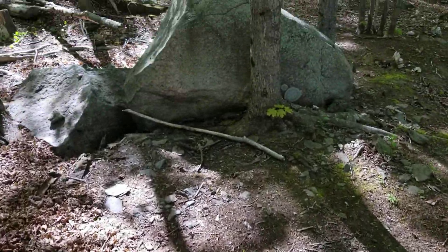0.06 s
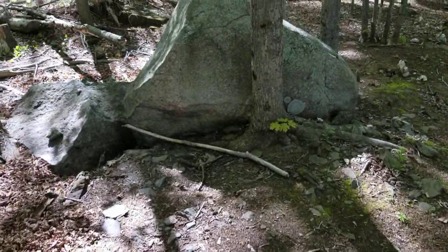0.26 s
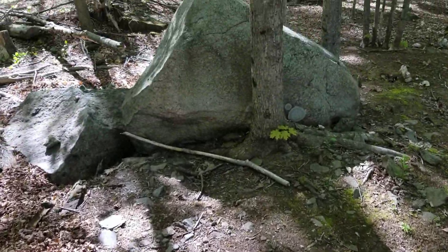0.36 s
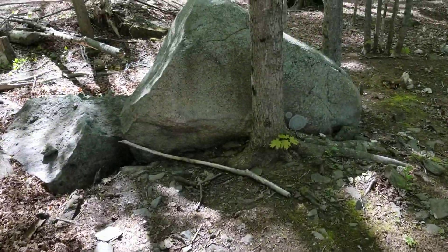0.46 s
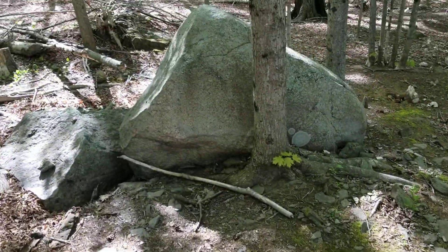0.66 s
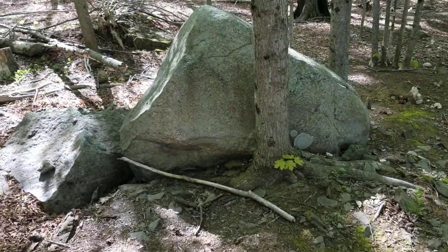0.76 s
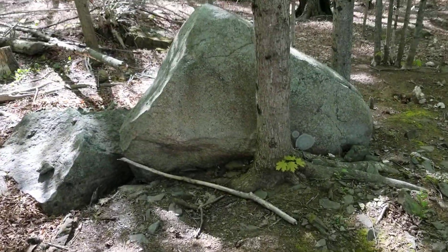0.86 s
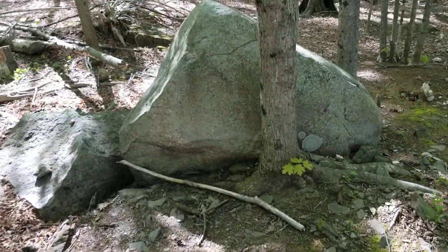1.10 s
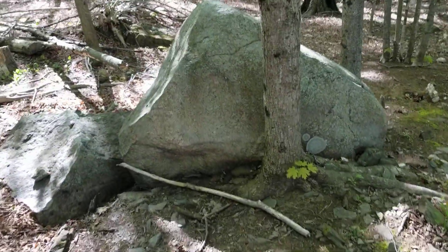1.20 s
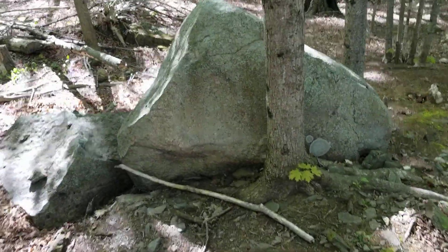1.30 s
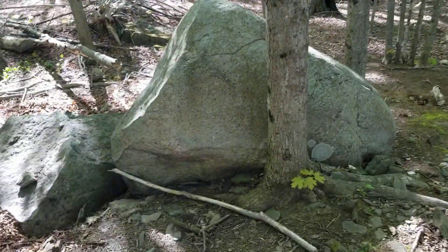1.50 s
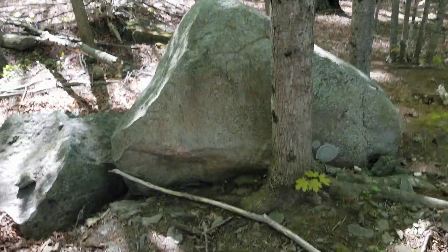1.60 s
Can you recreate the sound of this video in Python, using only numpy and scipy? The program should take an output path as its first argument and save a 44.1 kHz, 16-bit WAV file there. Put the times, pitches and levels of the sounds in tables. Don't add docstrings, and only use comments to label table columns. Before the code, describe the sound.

Footsteps in dry leaves, close to a handheld stereo microphone outdoors. Faint hush and low breeze rumble throughout. At about 0.2 s a soil thud and loud twig snap, several cracks within a few hundredths of a second, splintering briefly. Leaves drag and fade, drifting slightly right, while a distant bird whistles falling notes from 0.45 to 1.0 s. From 1.05 s heavier crunching, knocks and small snaps, strongest 1.3-1.5 s; bird again near 1.6 s.

```python
import sys
import numpy as np
from scipy import signal
from scipy.fft import rfft, irfft
from scipy.io import wavfile
from scipy.ndimage import map_coordinates

SR = 44100
rng = np.random.default_rng(int(sys.argv[2]) if len(sys.argv) > 2 else 0)


def amplitude_ratio(level_db):
    exponent = np.asarray(level_db, float) / 20
    return 10 ** exponent


def master_out(mix):
    frames = np.transpose(np.atleast_2d(mix))
    ceiling = np.clip(frames, -1, 1)
    pcm = np.round(ceiling * 32767).astype(np.int16)
    wavfile.write(sys.argv[1], SR, pcm)


N = 72765


def colour(x, points):
    hz, db = np.array(points, float).T
    grid_hz = np.linspace(1, SR / 2, 2049)
    gain = amplitude_ratio(np.interp(np.log(grid_hz), np.log(hz), db))
    cepstrum = irfft(np.log(gain))
    cepstrum[1:2048] *= 2
    cepstrum[2049:] = 0
    impulse = irfft(np.exp(rfft(cepstrum)))
    return signal.fftconvolve(x, impulse.reshape((1,) * (x.ndim - 1) + (-1,)), axes=-1)[..., :N]


def band(x, hz, kind, order=2):
    return signal.sosfilt(signal.butter(order, hz, kind, fs=SR, output="sos"), x)


def smooth_low(x, hz):
    return signal.filtfilt(*signal.butter(2, hz, fs=SR), x)


def pair(alike_hz):
    noise = rng.standard_normal((3, N))
    return band(noise[:1], alike_hz, "low", order=1) + band(noise[1:], alike_hz, "high", order=1)


def walk(rate_hz):
    x = band(rng.standard_normal(N + SR), rate_hz, "low")[SR:]
    return x / x.std()


def echo(x, t60_s):
    t = np.arange(SR) / SR
    tail = rng.standard_normal((2, SR)) * amplitude_ratio(-60 * t / t60_s) * np.minimum(t / 0.03, 1)
    tail = tail / np.sqrt(np.sum(tail ** 2, axis=1, keepdims=True))
    return signal.fftconvolve(np.atleast_2d(x), tail, axes=1)[:, :N]


def burst(t, start_s, rise_s, t60_s):
    late_s = t - start_s
    return np.where(late_s < 0, np.exp(-(late_s / rise_s) ** 2), amplitude_ratio(-120 * np.maximum(late_s, 0) / t60_s))


def crackle(spread_db):
    grains_per_s, grain_s, alike_hz = 3000, 0.0011, 1620
    chance = rng.random((2, N))
    hits = (chance[0] < grains_per_s / SR) * amplitude_ratio(-2 * spread_db * np.log(chance[1] + 1e-9))
    grain = np.sqrt(signal.lfilter([1], [1, -np.exp(-1 / (grain_s * SR))], hits))
    return grain / np.sqrt(np.mean(grain ** 2)) * pair(alike_hz)


def halves(source, low_gain, top_gain):
    split_hz = 8200
    low = band(source, split_hz, "low", order=4)
    top = band(source, split_hz, "high", order=4)
    return low * low_gain + top * top_gain


def mix(source, t, rows):
    power = 0
    for peak_s, db, rise_s, t60_s, top_db in rows:
        power = power + burst(t, peak_s, rise_s, t60_s) * amplitude_ratio([[2 * db], [2 * (db + top_db)]])
    return halves(source, *np.sqrt(power))


def air():
    hush_db, hush_alike_hz = -64.5, 1490
    wind_db, wind_low_hz, wind_high_hz, gust_db, gust_hz = -67.5, 27, 63, 2.6, 3.2
    # hz, gain_db
    hush_shape = [(25, -24), (60, 10), (111, 5), (277, -14), (416, -24.5), (1940, -36.5), (4500, -6.5),
                  (9000, -24.5)]
    hush = colour(pair(hush_alike_hz), hush_shape)
    wind = band(band(rng.standard_normal((2, N)), wind_high_hz, "low"), wind_low_hz, "high")
    wind = wind * amplitude_ratio(gust_db * walk(gust_hz))
    return hush / hush.std() * amplitude_ratio(hush_db) + wind / wind.std() * amplitude_ratio(wind_db)


def bird(t):
    warble_hz, warble_rate_hz, bend = 85, 152, 1.7
    pan_db, echo_db, echo_t60_s = -7.5, 2, 0.5
    # start_s, length_s, from_hz, to_hz, level_db
    notes_sung = [
        (.445, .04, 4800, 4030, -60),
        (.6, 0.039, 5630, 5200, -65),
        (0.631, 0.038, 5483, 3940, -58),
        (0.763, 0.022, 4260, 4630, -59),
        (0.788, 0.064, 4480, 3057, -66.5),
        (0.922, 0.034, 5700, 5320, -59.5),
        (.964, 0.038, 5660, 3830, -57),
        (1.585, 0.044, 5450, 5280, -61),
        (1.627, 0.018, 5400, 4050, -51),
    ]
    warble = warble_hz * walk(warble_rate_hz)
    out = 0
    for start_s, length_s, from_hz, to_hz, db in notes_sung:
        part = np.clip((t - start_s) / length_s, 0, 1)
        hz = to_hz + (from_hz - to_hz) * (1 - part) ** bend
        swell = np.sin(np.pi * part ** 1.05) ** 0.19
        out = out + amplitude_ratio(db) * swell * np.sin(2 * np.pi * np.cumsum(hz + warble) / SR)
    return (out + amplitude_ratio(echo_db) * echo(out, echo_t60_s)) * amplitude_ratio([[pan_db / 2], [-pan_db / 2]])


def thuds(t):
    push_cycles, ring_cycles = .25, 5.5
    rub_share, rub_rise_s, soil_q = .22, .003, .8
    # start_s, level_db, pitch_hz, t60_s
    knocks = [(.165, -57.5, 295, 0.054), (0.2247, -33.5, 285, 0.0083), (.2258, -40.5, 850, 0.023),
              (.2855, -44.5, 620, 0.036), (0.3403, -51, 310, .03), (1.084, -57, 231, 0.072),
              (1.245, -46.5, 650, 0.025), (1.296, -38.5, 696, 0.038), (1.331, -35.5, 1160, 0.018),
              (1.359, -50, 285, 0.15), (1.389, -44.5, 414, 0.24), (1.457, -39, 440, 0.06),
              (1.485, -49, 1010, 0.029), (1.557, -53, 744, 0.14), (1.628, -44, 490, 0.28),
              (1.638, -43.5, 184, 0.18)]
    out = 0
    for start_s, db, hz, t60_s in knocks:
        push_s = push_cycles / hz
        ring = np.sin(2 * np.pi * hz * (t - start_s))
        ring = ring * np.sqrt(burst(t, start_s + push_s, push_s, ring_cycles / hz))
        soil = signal.iirpeak(hz, soil_q, fs=SR)
        rub = signal.lfilter(*soil, signal.lfilter(*soil, rng.standard_normal(N)))
        rub = rub * np.sqrt(SR / hz) * rub_share
        out = out + amplitude_ratio(db) * (ring + rub * np.sqrt(burst(t, start_s + rub_rise_s, rub_rise_s, t60_s)))
    return out


def twigs(t):
    ring_hz, ring_spread, ring_t60_s, ring_db, ring_right_db = 4300, 0.049, .014, 3, -7
    ring_rise_s, crack_rise_s, spread_db = 0.000078, .0002, 1.0
    break_s = [.2226, .2264, .2292, .2405]
    # level_db, t60_s, top_db
    break_steps = [
        (-16.5, .035, -6),
        (-17.5, .028, -3),
        (-25, .11, 3),
        (-36, .08, -3),
    ]
    # start_s, level_db, t60_s, top_db
    small_cracks = [(0.058, -76, 0.0125, -5), (0.152, -64, 0.018, 6), (0.775, -68, .02, 10.5),
                    (.797, -53.5, 0.022, -30), (.895, -70, .015, 0), (1.328, -38, 0.012, -12),
                    (1.417, -50, 0.011, 13.5), (1.442, -45, 0.015, 3.5), (1.495, -35.5, 0.023, -11),
                    (1.54, -41.5, 0.024, 0), (1.588, -44, 0.0096, -6)]
    # hz, gain_db
    twig_shape = [(100, -12), (300, -10), (1000, -14.5), (2000, -12), (3500, 3.5), (15000, -0.5)]
    rows = [(start_s, *step) for start_s, step in zip(break_s, break_steps)] + list(small_cracks)
    ring = 0
    for start_s, db, t60_s, top_db in rows:
        hz = ring_hz * (1 + ring_spread * rng.standard_normal())
        fade = np.sqrt(burst(t, start_s, ring_rise_s, ring_t60_s))
        ring = ring + amplitude_ratio(db + ring_db) * np.sin(2 * np.pi * hz * (t - start_s)) * fade
    cracks = [(start_s, db, crack_rise_s, t60_s, top_db) for start_s, db, t60_s, top_db in rows]
    return ring * amplitude_ratio([[0], [ring_right_db]]) + mix(colour(crackle(spread_db), twig_shape), t, cracks)


def patchy(x):
    depth_db, patches_per_s = 1.5, 25
    out = 0
    for hz in (700, 1400, 2800, 5600):
        low = smooth_low(x, hz)
        out = out + low * amplitude_ratio(depth_db * walk(patches_per_s))
        x = x - low
    return out + x * amplitude_ratio(depth_db * walk(patches_per_s))


def leaves(t):
    stir_spread_db, crunch_spread_db, weight_hz = 1.8, 2.4, 2260
    # time_s, drag_db, top_db (dryness), weight_db (press of the sole)
    drag = [(0, -60, -3, -4), (.1, -65.5, 6.5, -1), (0.201, -59.5, -3.5, -6.5), (.26, -48, -5, -2),
            (.35, -54, -13.5, -4), (.45, -58.5, 4.5, 1), (0.558, -58, 3.5, -3), (0.639, -65.5, -1, -4.5),
            (.8, -74.5, 2.5, -1), (1.03, -68, -20, -5.5), (1.068, -60.5, -12, -5), (1.14, -50, -7, -7.5),
            (1.18, -52.5, -11.5, 1.5), (1.3, -44, 3.5, -1), (1.39, -50.5, -2, 3.5), (1.45, -43.5, -3, 0),
            (1.578, -49.5, 0.5, 5.5), (1.65, -57, -9, -3)]
    # peak_s, level_db, rise_s, t60_s, top_db
    crunches = [(.187, -52, 0.0032, 0.052, 7.5), (1.042, -54, 0.0041, 0.056, -23),
                (1.073, -55, 0.00087, .03, -18), (1.093, -41.5, 0.0085, 0.23, 2.5),
                (1.13, -43, 0.0014, .04, -15), (1.197, -46.5, 0.015, 0.092, 0),
                (1.242, -40.5, 0.02, 0.083, 1.5), (1.292, -40.5, 0.012, 0.093, -14),
                (1.32, -34, 0.0014, 0.035, -3), (1.33, -29.5, 0.0024, 0.065, 0),
                (1.396, -40, 0.0063, 0.098, -40), (1.432, -53, 0.0045, 0.036, 8),
                (1.485, -36, 0.0032, 0.048, -4), (1.499, -32.5, 0.0027, 0.073, -5.5),
                (1.565, -45.5, 0.0038, 0.075, -6)]
    # hz, gain_db
    leaf_shape = [(60, -40), (150, -3), (300, -5.5), (800, -4), (2000, -3), (5000, 5.5), (15000, -2)]
    at_s, drag_db, top_db, weight_db = np.array(drag).T
    stir = amplitude_ratio(np.interp(t, at_s, drag_db))
    stir_top = stir * amplitude_ratio(np.interp(t, at_s, top_db))
    bed = halves(colour(crackle(stir_spread_db), leaf_shape), stir, stir_top)
    litter = patchy(bed) + mix(colour(crackle(crunch_spread_db), leaf_shape), t, crunches)
    return litter + smooth_low(litter, weight_hz) * (amplitude_ratio(np.interp(t, at_s, weight_db)) - 1)


def scene():
    trunks_db, trunks_t60_s = -16, 0.5
    # time_s, left_minus_right_db, left_late_s
    place = [
        (.2, -0.5, -.00005),
        (.45, -2, -.00005),
        (1.0, -4, .00013),
        (1.6, -1, .00013),
    ]
    # hz, gain_db
    port_left = [(200, -1), (2200, 5), (4000, 2.5), (5800, 5.5), (7400, 4.5), (8500, -4), (11000, 6),
                 (15000, 15)]
    # hz, gain_db
    port_right = [(200, -1), (2200, 1), (4500, 0), (5500, 7), (6600, -3.5), (7300, -38), (8600, -9),
                  (15000, -1.5)]
    t = np.arange(N) / SR
    feet = leaves(t) + twigs(t) + thuds(t)
    at_s, pan_db, late_s = np.array(place).T
    left = map_coordinates(feet[0], [(t - np.interp(t, at_s, late_s)) * SR], mode="nearest")
    half = amplitude_ratio(np.interp(t, at_s, pan_db) / 2)
    feet = np.array([left * half, feet[1] / half])
    wood = feet + amplitude_ratio(trunks_db) * echo(feet, trunks_t60_s) + air()
    return np.array([colour(wood[0], port_left), colour(wood[1], port_right)]) + bird(t)


def roll_off(x):
    return signal.sosfilt(signal.butter(12, 16800, fs=SR, output="sos"), x)


def record(dry):
    top_hz, ripple_db, stop_db = 15700, .5, 34
    cut = signal.sosfilt(signal.ellip(8, ripple_db, stop_db, top_hz, fs=SR, output="sos"), dry)
    return roll_off(cut)


dry = scene()
out = record(dry)
master_out(out)
```